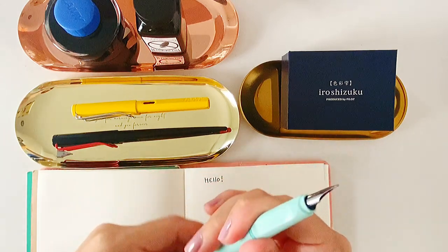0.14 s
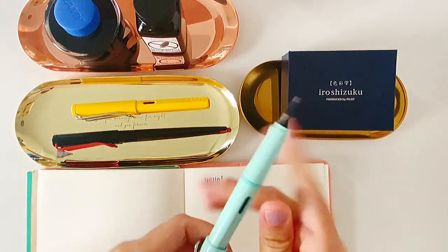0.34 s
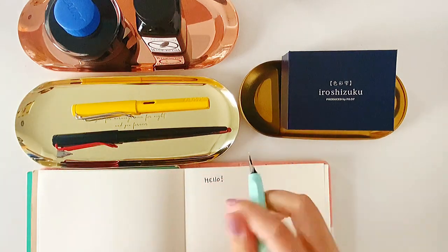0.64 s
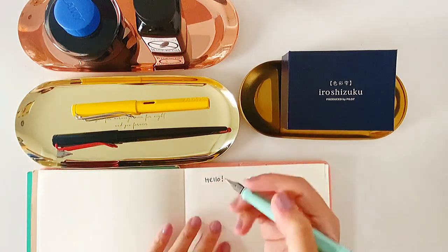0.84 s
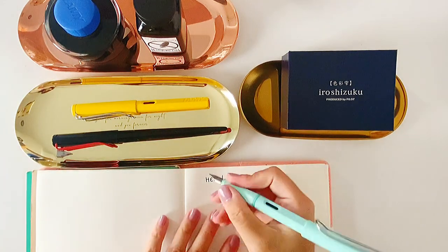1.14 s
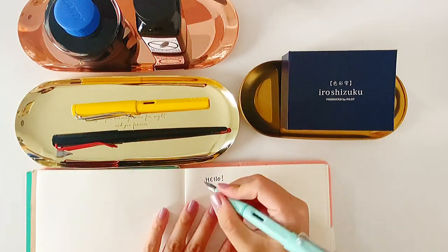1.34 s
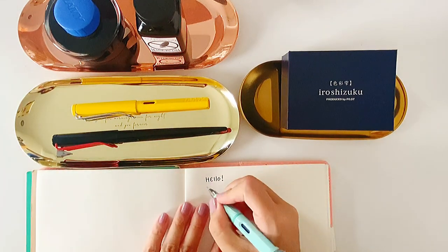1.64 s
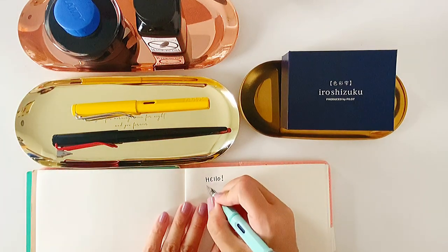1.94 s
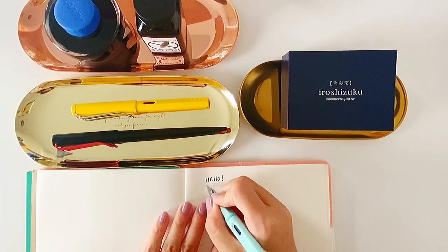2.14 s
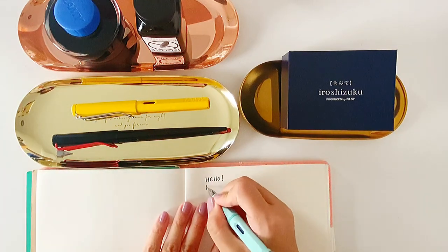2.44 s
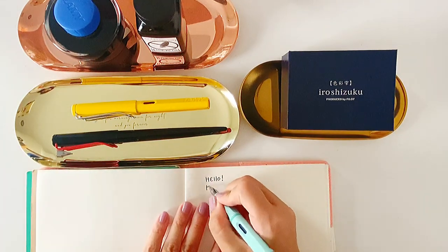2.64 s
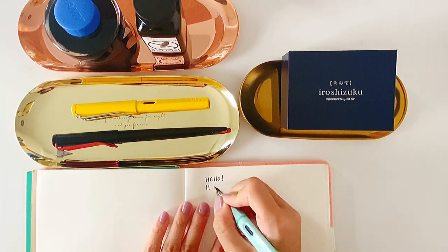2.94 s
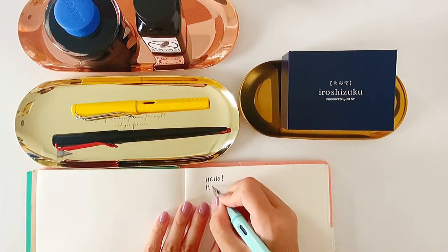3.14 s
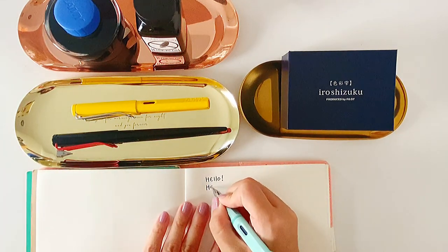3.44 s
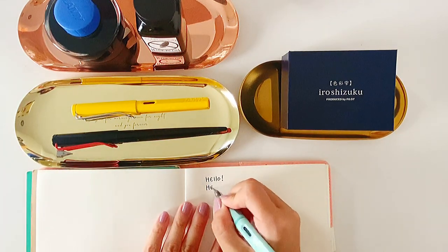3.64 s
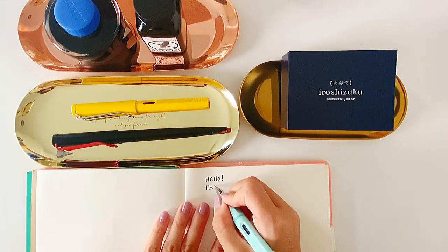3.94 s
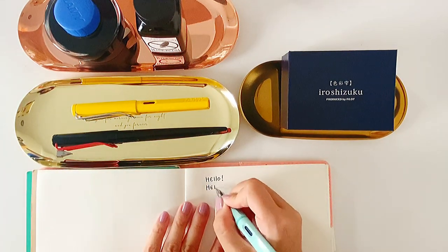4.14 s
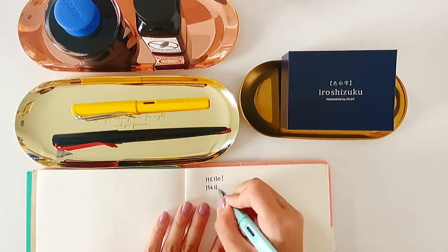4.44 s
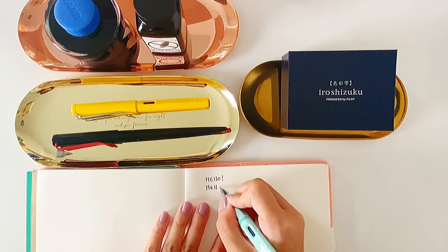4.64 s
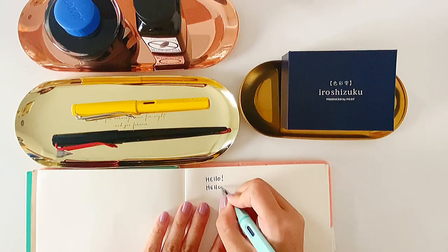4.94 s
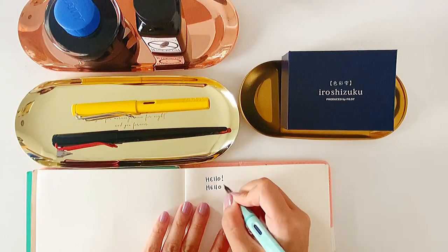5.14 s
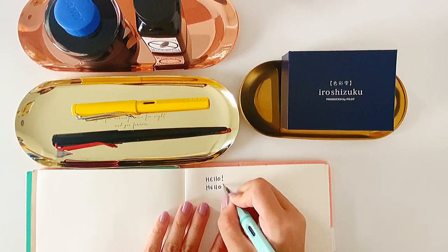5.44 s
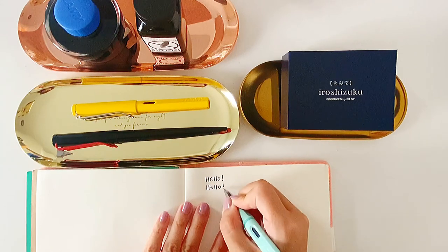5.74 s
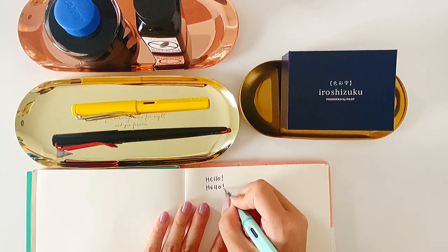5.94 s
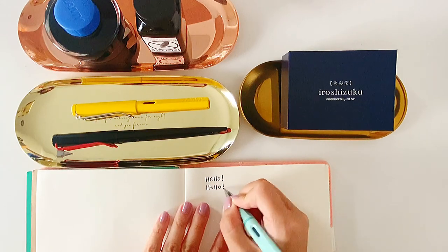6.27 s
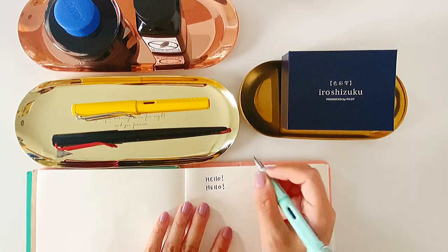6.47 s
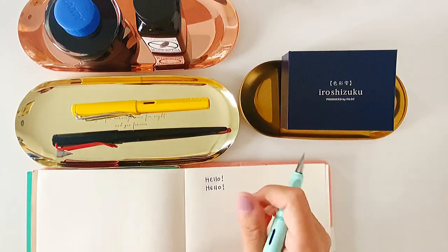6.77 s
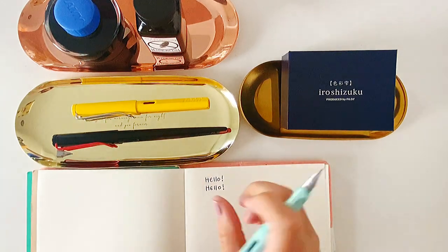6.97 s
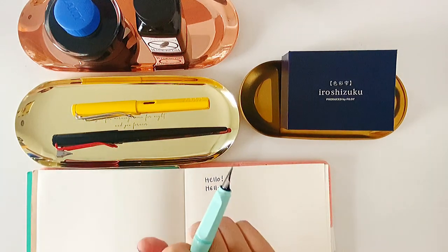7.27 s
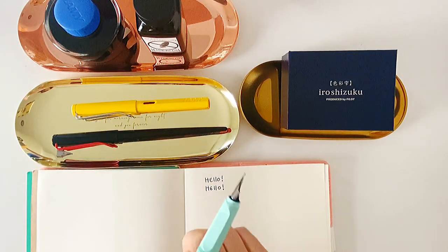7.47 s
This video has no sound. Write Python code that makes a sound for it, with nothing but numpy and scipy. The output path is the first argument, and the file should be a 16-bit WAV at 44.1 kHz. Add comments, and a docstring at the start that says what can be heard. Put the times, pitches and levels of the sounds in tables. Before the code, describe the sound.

A fountain pen scratches short, dry strokes on notebook paper in a quiet rumbling room, framed by hand rustles, small clicks and a final stuttering finger rub.

```python
"""A desk in a quiet room: a steel-nibbed fountain pen writes one short word in a notebook.
Ventilation rumbles softly throughout, as filtered noise. Hands brush into place on the page, as noise shaped by speed.
The pen creaks in the fingers and gives small clicks, ringing damped modes; the nib taps and scratches in uneven catches.
Then the hands slide off, one finger juddering in stick-slip. Pen sounds carry desk echoes and a short room tail."""
import sys
import numpy as np
from scipy import signal
from scipy.fft import rfft, irfft
from scipy.io import wavfile
from scipy.ndimage import uniform_filter1d, map_coordinates

SR = 44100
rng = np.random.default_rng(int(sys.argv[2]) if len(sys.argv) > 2 else 0)


def output_pcm(signal):
    """Save a mono or channel-first signal as 16-bit PCM at the path in sys.argv[1].

    Samples are clipped to [-1, 1] before scaling.
    """
    pcm = np.clip(np.atleast_2d(signal).T, -1, 1) * 32767
    wavfile.write(sys.argv[1], SR, np.round(pcm).astype(np.int16))


N = 335601
TIME = np.arange(N) / SR
FREQS = np.fft.rfftfreq(N, 1 / SR)


def amp(db):
    """Decibels to gain."""
    return 10 ** (np.asarray(db) / 20)


def evened(x):
    """Scales to an rms of 1."""
    return x / np.sqrt(np.mean(x ** 2) + 1e-20)


def add(mix, s, sound):
    """Mixes a sound in at time s."""
    part = mix[max(round(s * SR), 0):][:len(sound)]
    part += sound[:len(part)]


def colour(x, points):
    """Filters by a spectrum that falls away beyond its ends; white noise keeps its power."""
    hz, db = np.transpose(points)
    gain = amp(np.interp(np.log(FREQS + 1), np.log(hz), db))
    gain *= np.minimum(FREQS / hz[0], 1) ** 2
    gain *= np.minimum(hz[-1] / (FREQS + 1), 1) ** 4
    return irfft(rfft(x) * evened(gain), N)


def humps(x, modes):
    """Filters by steep-sided resonances; white noise keeps its power."""
    power = sum(amp(db) ** 2 / (1 + (2 * (FREQS - hz) / width) ** 2 / 2) ** 2 for hz, width, db in modes)
    return irfft(rfft(x) * evened(np.sqrt(power)), N)


def ring(modes, contact_s=0.000091, size=1024):
    """The answer of damped modes to one blow softened by its contact time, with a peak of 1."""
    t = TIME[:size]
    wave = sum(amp(db) * np.exp(-np.pi * width * t) * np.sin(2 * np.pi * hz * t) for hz, width, db in modes)
    wave = wave * (1 - np.exp(-t / contact_s))
    return wave / abs(wave).max()


def blows(rows):
    """One impulse for each row (t/s, level/dB)."""
    out = np.zeros(N)
    for s, db in rows:
        add(out, s, amp([db]))
    return out


def friction(per_s, spread_db, patchy_db, size=180):
    """Countless tiny catches of uneven strength, clumped by the grain of the paper."""
    catches = (rng.random(N) < per_s / SR) * rng.standard_normal(N)
    strength_db = spread_db * np.minimum(rng.exponential(1, N), 4)
    patches = evened(uniform_filter1d(rng.standard_normal(N), size))
    return evened(catches * amp(strength_db + patchy_db * patches))


def arch(length, crest, point):
    """Speed of one movement: from rest up to 1 at its crest and back to rest."""
    crest = np.clip(crest, .05, .95)
    phase = np.interp(np.linspace(0, 1, round(length * SR)), [0, crest, 1], [0, .5, 1])
    return abs(np.sin(np.pi * phase)) ** point


def during(x, start, speed):
    """The stretch of a friction noise that one movement sounds, as loud as the movement is fast."""
    return speed * x.take(round(start * SR) + np.arange(len(speed)), mode="wrap")


def nearby(x, echo_db, drift, count=4):
    """Reflections off hand and page, centimetres away; delays drift (s per s) as the hand moves, sweeping the colour."""
    t, out = TIME[:len(x)], x
    for k, (place, way) in enumerate(rng.random((count, 2))):
        delay = .0004 * (1 + k + place) + drift * (2 * way - 1) * (t - t.mean())
        echo = map_coordinates(x, [(t - delay) * SR], order=3)
        out = out + (-1) ** k * amp(echo_db) * echo
    return out / np.sqrt(1 + count * amp(echo_db) ** 2)


SLIP_JITTER, SLIP_SPREAD_DB = 0.046, -1.5  # unevenness of the slips: share of a period, dB


def stick_slip(drag):
    """Slightly uneven slips (t/s, level/dB), one per turn along a curve of (t/s, slips per s, level/dB)."""
    s, per_s, db = np.transpose(drag)
    turns = np.cumsum(np.interp(TIME, s, per_s, 0, 0)) / SR
    at = TIME[1:][np.diff(np.round(turns)) > 0]
    late, strong = rng.standard_normal((64, 2))[:len(at)].T
    slip_s = at + SLIP_JITTER * late / np.interp(at, s, per_s)
    slip_db = np.interp(at, s, db) + SLIP_SPREAD_DB * strong
    return list(zip(slip_s, slip_db))


# spectrum of the deep rumble: [f/Hz, level/dB]
RUMBLE_SPECTRUM = [(12, 7), (25, 2), (36, -13), (48, -7.5), (58, -10.5), (70, -16), (100, -23),
                   (145, -24.5), (175, -19), (205, -22.5), (240, -24), (280, -30.5), (350, -27.5),
                   (420, -43.5)]
# slow swell of the rumble: [t/s, rms level/dB]
RUMBLE_SWELL = [(0, -36.5), (1.7, -34), (2.2, -35.5), (5.2, -37.5), (6, -35.5), (7.6, -34.5)]
# spectrum of the wash of air: [f/Hz, level/dB]
AIR_SPECTRUM = [(220, -32), (380, -11), (398, -8.5), (527, -2), (579, -5), (742, -9.5), (867, -11.5),
                (1010, -6), (1100, -11.5), (1170, -10.5), (2070, -20), (2580, -24), (4450, -30),
                (6070, -29.5), (15700, -36)]
AIR_DB = -61.5
# narrow hums of the ventilation: [f/Hz, width/Hz, rms level/dB]
VENT_HUMS = [(24.3, 5.5, -42.5), (56.9, 4.4, -50), (119.06, 0.84, -59), (235.1, 23.5, -61),
             (320.6, 14, -65), (364.5, 7.1, -67), (1035, 15, -83.5), (4500, 690, -82.5), (6270, 11, -99)]


def ventilation():
    """Background: a deep, slowly swelling rumble, wavering hums of narrow noise and a faint wash of air."""
    swell = amp(np.interp(TIME, *np.transpose(RUMBLE_SWELL)))
    rumble = swell * evened(colour(rng.standard_normal(N), RUMBLE_SPECTRUM))
    air = amp(AIR_DB) * colour(rng.standard_normal(N), AIR_SPECTRUM)
    hums = sum(amp(db) * evened(humps(rng.standard_normal(N), [(hz, width, 0)])) for hz, width, db in VENT_HUMS)
    return rumble + air + hums


# reflections from desk and trays: [delay t/s, level/dB]
DESK_ECHOES = [(.0029, -31), (.0046, -14), (.0058, -16)]


def room(x, t60=0.17, wet_db=-17, size=16384):
    """Close reflections from the desk, then a short weak tail of decaying noise."""
    t = TIME[:size]
    tail = rng.standard_normal(size) * np.exp(-np.log(1000) * t / t60)
    response = tail * (t > DESK_ECHOES[0][0])
    response *= amp(wet_db) / np.linalg.norm(response)
    direct = (0.0005, 0.023)  # t/s, level/dB
    for s, db in [direct] + list(DESK_ECHOES):
        add(response, s, amp([db]))
    return signal.oaconvolve(x, response)[:N]


# hand movements over the page: [start t/s, length t/s, fastest at 0-1,
# rub of pressed skin level/dB, airy brush of light skin level/dB, resonance of the page level/dB]
HAND_SWEEPS = [ (0.106, 0.35, 0.5, -71.5, -63, -64), (0.173, 0.052, 0.5, -62, -54.5, -82),
               (0.431, 0.13, 0.35, -73, -62.5, -85), (0.565, 0.08, .55, -79, -62, -79),
               (0.734, 0.16, 0.63, -56, -58.5, -65), (0.716, .06, .6, -60, -73, -66),
               (.764, 0.017, 0.6, -50.5, -62, -51), (0.776, 0.048, .6, -53, -76, -61),
               (0.869, .15, 0.22, -65, -65.5, -66.5), (0.986, 0.17, 0.57, -62.5, -58.5, -63.5),
               (1.114, 0.11, .55, -62, -58, -64), (1.216, 0.17, 0.6, -62, -60.5, -59.5),
               (1.354, 0.12, 0.51, -63, -62, -60.5), (6.207, 0.16, 0.53, -63.5, -56.5, -63),
               (6.32, 0.24, .8, -69, -71, -65), (6.459, 0.18, 0.86, -53.5, -55, -69),
               (6.6, .2, 0, -68.5, -73, -80), (6.772, 0.082, 0.4, -77, -64.5, -86),
               (6.83, 0.38, .55, -76, -65.5, -95), (6.933, .085, 0.1, -87, -64, -88),
               (7.453, 0.19, 0.2, -66, -62, -64.5), (7.51, 0.25, 0.7, -65, -54, -77), ]
# spectrum of pressed skin: [f/Hz, level/dB]
RUB_SPECTRUM = [(150, 6), (500, 5), (1200, -8.5), (2800, -10.5), (3600, 3.5), (4800, 3.5), (6000, 2),
                (7500, -1.5), (10000, -7.5), (15700, -28)]
# spectrum of light skin: [f/Hz, level/dB]
BRUSH_SPECTRUM = [(600, -56), (2200, 0.5), (6000, -4), (8000, 0), (10000, 3.5), (12000, 5.5), (13700, 6),
                  (15700, -2)]
# resonances of the page under a sliding hand: [f/Hz, width/Hz, level/dB]
PAGE_MODES = [(1200, 620, -4), (1970, 1180, 6), (4600, 900, -3)]
SWEEP_POINT = 0.87  # how pointed the arch of speed is


def hands():
    """Skin slides over paper: a fuller rub when pressed, a thin brush when light, and the page sounds along."""
    rub = colour(friction(per_s=7000, spread_db=0.4, patchy_db=-5.1), RUB_SPECTRUM)
    brush = colour(friction(per_s=21000, spread_db=-7.5, patchy_db=0.8), BRUSH_SPECTRUM)
    page = humps(friction(per_s=6000, spread_db=-3.5, patchy_db=0.0), PAGE_MODES)
    out = np.zeros(N)
    for start, length, crest, rub_db, brush_db, page_db in HAND_SWEEPS:
        speed = arch(length, crest, SWEEP_POINT)
        slide = amp(rub_db) * during(rub, start, speed) + amp(brush_db) * during(brush, start, speed)
        add(out, start, nearby(slide, echo_db=-12.5, drift=.0008))
        add(out, start, amp(page_db) * during(page, start, speed))
    return out


# a finger sticks and slips across the page: [t/s, slips per s, level/dB]
FINGER_DRAG = [(7.172, 125, -46), (7.235, 62, -50), (7.3, 108, -45), (7.355, 108, -39), (7.395, 143, -37),
               (7.452, 115, -31), (7.472, 140, -42)]
# spectrum of the scrape and release: [f/Hz, level/dB]
JUDDER_SPECTRUM = [(300, 3), (900, 5.5), (1700, -0.5), (2550, 3), (3400, 1), (4500, -4), (5200, -2),
                   (6000, 1), (7100, -7), (9300, 3.5), (10300, 0), (11700, 5), (13500, 1), (15700, -7)]
# resonances shaken by the slipping finger: [f/Hz, width/Hz, level/dB]
FINGER_MODES = [(2570, 190, 7.5), (4580, 380, 5), (5700, 330, 2), (6130, 240, 3)]


def judder(spurt_s=0.00053, slide_s=0.013, slide_db=-25, friction_db=-7, release_db=-4, ring_db=-5, lowest_hz=420):
    """Each slip of the finger is a sharp, ringing release in a spurt of friction; a weaker slide runs between."""
    t = TIME[:8192] - TIME[4096]
    slips = blows(stick_slip(FINGER_DRAG))
    spurt = np.exp(-abs(t) / spurt_s) + amp(slide_db) * np.exp(-abs(t) / slide_s)
    speed = signal.oaconvolve(slips, spurt, "same")
    # random signs turn the speed into two independent noises
    scrape, shake = amp(friction_db) * speed * rng.choice([-1, 1], (2, N))
    rasp = colour(scrape + amp(release_db) * slips, JUDDER_SPECTRUM)
    rasp = rasp + amp(ring_db) * humps(shake, FINGER_MODES)
    return signal.sosfilt(signal.butter(2, lowest_hz, "high", fs=SR, output="sos"), rasp)


# pen or fingertip lands on the pad:
# [t/s, thud f/Hz, thud level/dB, ring f/Hz, ring level/dB, decay by 60 dB t/s]
PAD_TAPS = [(.334, 850, -45, 4280, -45, .02), (0.7695, 1620, -37, 2260, -32, 0.01),
            (1.346, 690, -33, 990, -32.5, 0.02), (3.105, 770, -34, 3510, -49, 0.0079),
            (4.681, 1240, -40, 3324, -43.5, 0.036), (6.5712, 765, -38, 1150, -42, 0.0082),
            (6.937, 1000, -55, 3040, -42, 0.012)]


def taps(size=4096, pad_hz=310, pad_db=-4, pad_t60=0.033):
    """Each landing thumps the soft pad and leaves a thud and a higher ring, all quickly damped."""
    out, t = np.zeros(N), TIME[:size]
    # the thump's level is relative to each thud
    thump = amp(pad_db) * np.sin(2 * np.pi * pad_hz * t) * np.exp(-np.log(1000) * t / pad_t60)
    contact = 1 - np.exp(-t / .0002)
    for s, thud_hz, thud_db, ring_hz, ring_db, t60 in PAD_TAPS:
        thud = amp(thud_db) * np.sin(2 * np.pi * thud_hz * t)
        high_ring = amp(ring_db) * np.sin(2 * np.pi * ring_hz * t)
        damped = (thud + high_ring) * np.exp(-np.log(1000) * t / t60)
        add(out, s, contact * (damped + amp(thud_db) * thump))
    return out


# small clicks of the pen: fingers on the barrel, light nib touches, the bright edge of a landing:
# [t/s, level/dB, treble snap relative level/dB, pitch factor, contacts]
PEN_CLICKS = [(.051, -52, -4, 0.54, 1), (0.1934, -33, -4.5, 0.7, 1), (0.3336, -38.5, -10, 0.79, 1),
              (0.372, -46.5, -1, 0.85, 1), (0.6723, -37, -17, 0.99, 4), (.73, -33.5, -11.5, 1.13, 1),
              (0.7688, -30.5, -21, 0.924, 3), (.802, -33.5, -20, 1.24, 1), (.8372, -33.5, -19, 1.04, 1),
              (1.157, -35, -15, 1.3, 1), (2.559, -42, -30, 0.44, 1), (2.5774, -47, -24, 0.47, 1),
              (2.584, -47.5, -13, 1.15, 1), (2.5897, -45, -23, 0.42, 1), (4.6805, -47, -4, .92, 1),
              (6.7585, -44, -7, 1.1, 1), (6.937, -43, -9, 1.6, 1), (7.4751, -32.5, -11, 0.63, 1),
              (7.5582, -42, 0, 1, 1)]
# resonances rung by each click, before the pitch factor: [f/Hz, width/Hz, level/dB]
CLICK_MODES = [(1700, 620, -13.5), (2550, 1600, 0), (3700, 460, -7.5), (4270, 190, -15.5)]
# the pen creaks in the grip: [t/s, slips per s, level/dB]
CREAK_DRAG = [(.012, 175, -54), (.045, 115, -43), (.08, 125, -52)]
# resonances of the gripped pen: [f/Hz, width/Hz, level/dB]
GRIP_MODES = [(2480, 270, 8), (2660, 290, -3), (4870, 220, -7)]
# spectrum of the treble snap: [f/Hz, level/dB]
SNAP_SPECTRUM = [(1000, -13), (4000, -6), (6500, -3.5), (11000, 8), (15700, -5)]
# the steel tines flick together: [t/s, level/dB]
TINE_FLICKS = [(2.5846, -53), (2.8752, -46), (2.8777, -26)]
# resonances of the tines: [f/Hz, width/Hz, level/dB]
TINE_MODES = [(8800, 900, -16), (10500, 1000, 4), (12100, 1100, 5), (13800, 1200, 1)]
BOUNCE_S = 0.0027  # mean gap between the contacts of a rattling click
CREAK_SNAP_DB = -15  # treble snap of each creaking slip, relative


def creaks_and_clicks(snap_s=0.00088):
    """The pen creaks in the grip and gives small ringing clicks, each contact with a treble snap; the tines tick."""
    slips = stick_slip(CREAK_DRAG)
    knocks, touches = np.zeros(N), [(s, db + CREAK_SNAP_DB) for s, db in slips]
    for s, db, snap_db, pitch, count in PEN_CLICKS:
        knock = amp(db) * ring([(hz * pitch, width, mode_db) for hz, width, mode_db in CLICK_MODES])
        gaps = BOUNCE_S * rng.uniform(.8, 1.2, round(count))
        for at in s + np.cumsum(gaps) - gaps[0]:
            add(knocks, at, knock)
            touches.append((at, db + snap_db))
    # each touch opens a burst of noise that decays over snap_s
    contact = signal.lfilter([1], [1, -np.exp(-1 / (snap_s * SR))], blows(touches))
    snaps = colour(contact * rng.standard_normal(N), SNAP_SPECTRUM)
    creaks = signal.oaconvolve(blows(slips), ring(GRIP_MODES))[:N]
    flicks = signal.oaconvolve(blows(TINE_FLICKS), ring(TINE_MODES))[:N]
    flicks = signal.sosfilt(signal.butter(4, 7500, "high", fs=SR, output="sos"), flicks)
    return knocks + snaps + creaks + flicks


# pen strokes: [start t/s, length t/s, drag of the nib level/dB, hiss of the paper fibres level/dB,
# pitch factor of the nib, its glide in octaves]
PEN_STROKES = [ (2.061, 0.14, -52, -51, 1.0, 0.0076), (2.388, 0.096, -54.5, -60, 1.03, -0.188),
               (2.623, 0.13, -50.5, -53, .99, 0), (2.767, 0.11, -66, -59.5, 0.95, 0),
               (3.14, 0.056, -58.5, -64.5, 0.92, 0.24), (3.177, 0.074, -62.5, -57, 1.02, 0.016),
               (3.232, .1, -56.5, -65, 0.91, 0), (3.343, 0.048, -63, -64.5, 0.96, 0),
               (3.413, .12, -58, -64, 1.02, 0.17), (3.544, 0.12, -68, -57.5, 1, 0),
               (3.893, 0.12, -65, -54, 0.97, -0.029), (4.197, 0.14, -65, -53.5, 1.2, 0.097),
               (4.315, 0.19, -69, -59.5, 1.1, -0.015), (4.655, 0.11, -67.5, -62, 1.1, 0),
               (4.724, 0.11, -61.5, -60.5, 1.1, -0.0075), (4.81, .15, -59.5, -66.5, 1.08, 0.033),
               (4.917, 0.045, -75, -63, 1.3, -0.024), (4.994, 0.089, -69, -56, 1.14, 0.046),
               (5.316, .112, -56, -58.5, 1.1, 0.041), (5.877, 0.049, -72, -81, 1.08, -0.06),
               (5.982, .05, -64.5, -76, 1.08, 0), (6.065, .05, -71.5, -79, 1.08, 0.05), ]
# resonances of nib and pad, before the pitch factor: [f/Hz, width/Hz, level/dB]
NIB_MODES = [(690, 850, -6.5), (1934, 240, 4), (2280, 320, 0), (3450, 470, -14)]
# fixed resonances of the steel nib, shaken by the drag: [f/Hz, width/Hz, level/dB]
STEEL_MODES = [(2490, 220, 4), (3150, 420, -3), (3850, 330, -2.5), (5350, 350, -8), (6570, 300, -5),
               (11600, 750, -7), (15500, 400, -14)]
# spectrum of the paper fibres: [f/Hz, level/dB]
FIBRE_SPECTRUM = [(150, -5), (450, 22.5), (1000, 10), (2200, 5.5), (3000, 4), (4500, 3), (6500, 0.5),
                  (7300, -3), (9500, -0.5), (10700, 2), (11700, 3.5), (12600, 2), (14000, -1), (15700, -2)]
STEEL_DB = -9.5  # relative to the drag
# one arch of speed for every stroke: where it is fastest (0-1), how pointed it is
STROKE_CREST, STROKE_POINT = 0.46, 1.53
HISS_POWER = 1.26  # the hiss grows as this power of the speed


def nib():
    """Main source: the dragged nib shakes pen and pad near 2 kHz and rings its steel; paper fibres hiss under it."""
    drag = humps(friction(per_s=3000, spread_db=0.5, patchy_db=1.1), NIB_MODES)
    steel = amp(STEEL_DB) * humps(friction(per_s=4000, spread_db=1.3, patchy_db=2.1), STEEL_MODES)
    hiss = colour(friction(per_s=16000, spread_db=-5.5, patchy_db=2.3), FIBRE_SPECTRUM)
    out = np.zeros(N)
    for start, length, drag_db, hiss_db, pitch, glide in PEN_STROKES:
        speed = arch(length, STROKE_CREST, STROKE_POINT)
        # reading the drag noise faster or slower bends its pitch
        bend = pitch * 2 ** (glide * np.linspace(-.5, .5, len(speed)))
        source = drag[round(start * SR):][:2 * len(speed)]
        shake = map_coordinates(source, [np.cumsum(bend)], order=3, mode="wrap")
        add(out, start, amp(drag_db) * (speed * shake + during(steel, start, speed)))
        fibres = during(hiss, start, speed ** HISS_POWER)
        add(out, start, amp(hiss_db) * nearby(fibres, echo_db=-24, drift=.0003))
    return out


def scene():
    """The pen with its desk reflections, the hands close and dry, and the room's own sound, in mono."""
    pen = room(nib() + creaks_and_clicks() + taps())
    return (ventilation() + hands() + judder() + pen)[None]


EDGE_HZ = 15900


def record(dry):
    """The recorder's steep upper band limit at EDGE_HZ."""
    low_pass = signal.firwin(401, EDGE_HZ, window=("kaiser", 9), fs=SR)
    return signal.oaconvolve(dry, low_pass[None], "same")


dry = scene()
out = record(dry)
output_pcm(out)
```